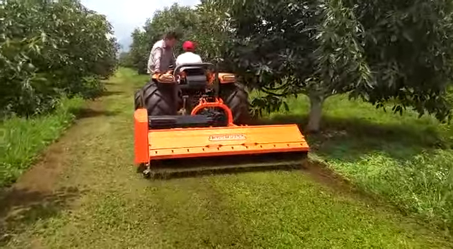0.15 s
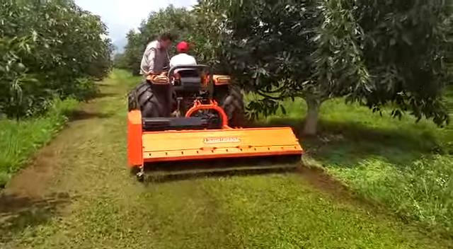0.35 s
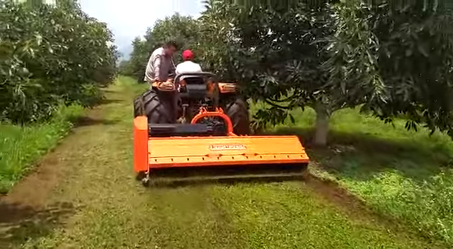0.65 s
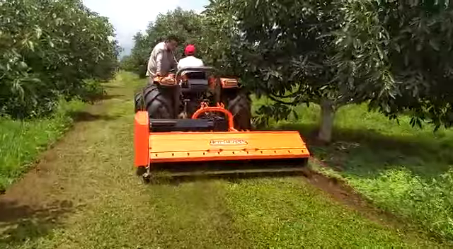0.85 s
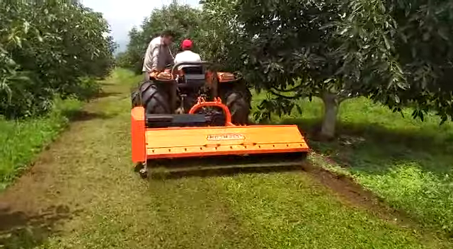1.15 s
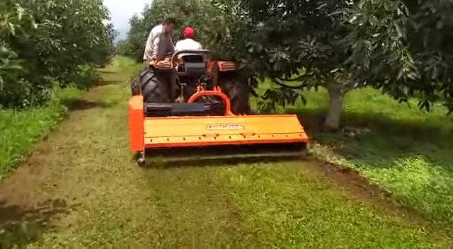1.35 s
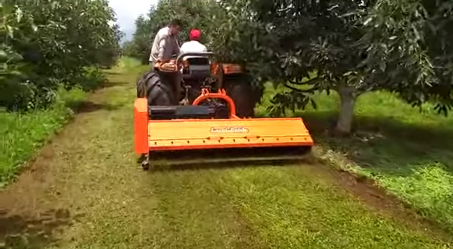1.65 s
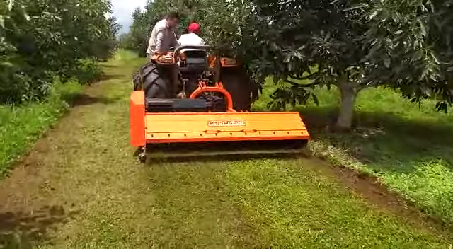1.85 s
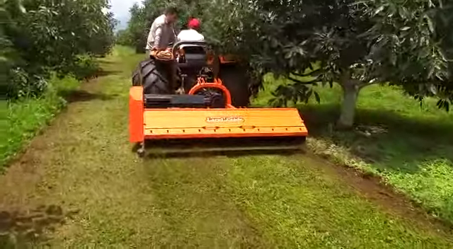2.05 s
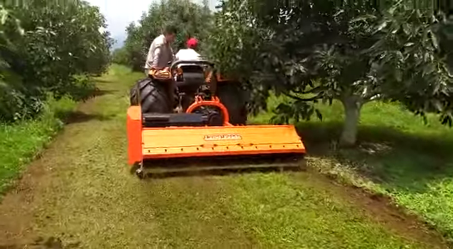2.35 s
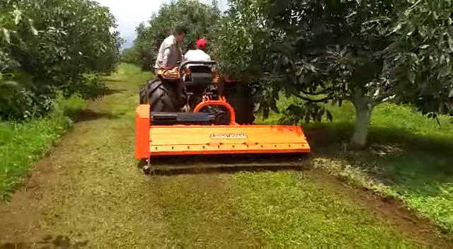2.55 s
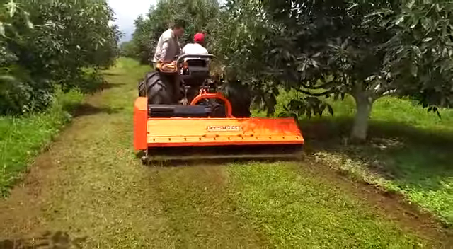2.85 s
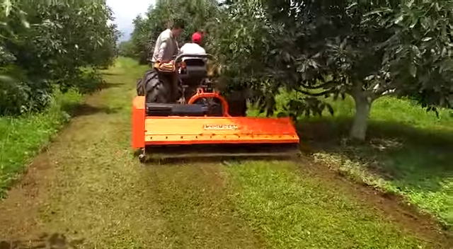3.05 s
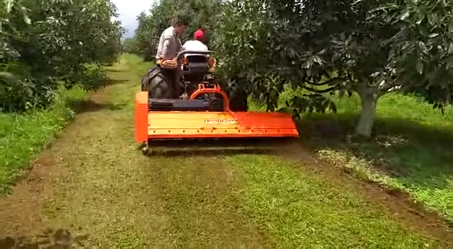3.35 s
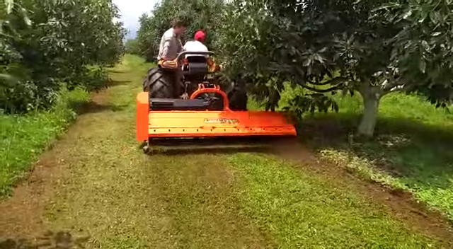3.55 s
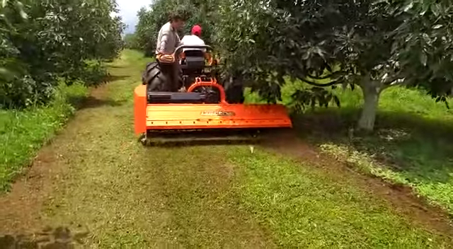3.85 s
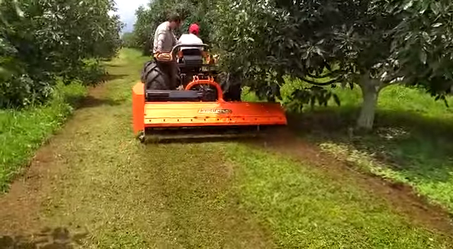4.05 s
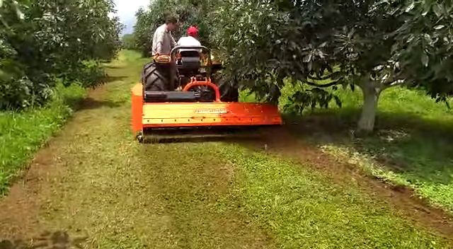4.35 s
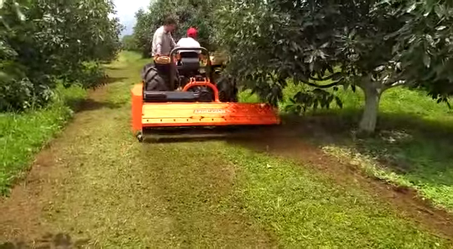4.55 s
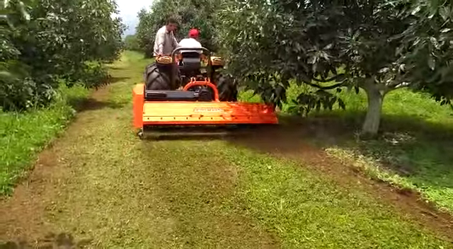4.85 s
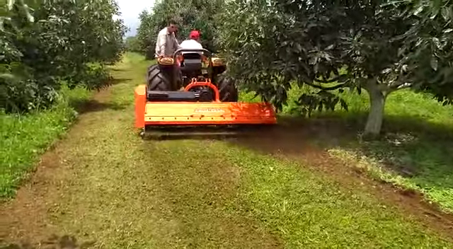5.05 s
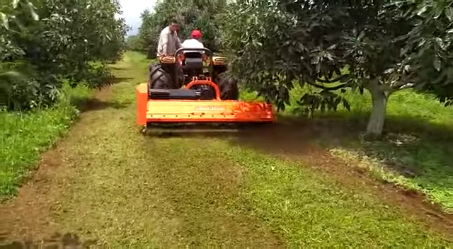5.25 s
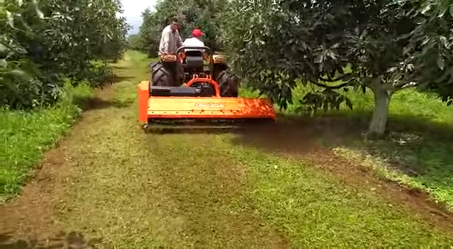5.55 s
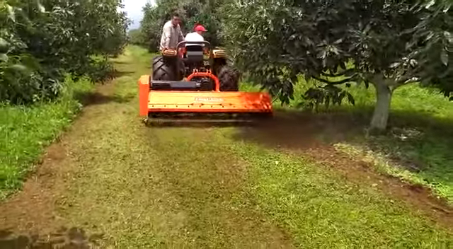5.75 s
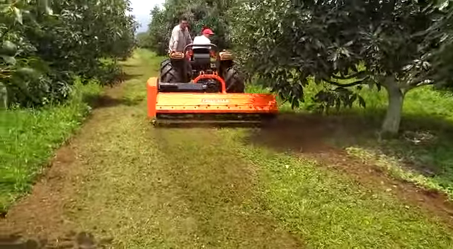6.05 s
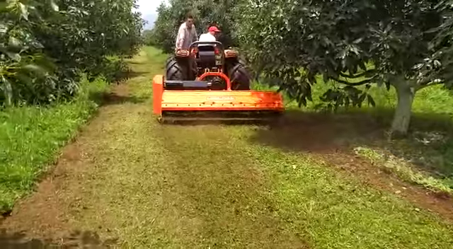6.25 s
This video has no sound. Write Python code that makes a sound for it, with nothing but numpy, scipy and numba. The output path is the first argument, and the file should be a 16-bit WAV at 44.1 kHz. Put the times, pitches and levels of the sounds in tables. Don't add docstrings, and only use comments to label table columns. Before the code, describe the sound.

A continuous mower drone with a rough, fluttering beat fills a small camera microphone outdoors. Beneath it a diesel exhaust throbs and gears whine thinly; above it cut stalks spray with a bright, pulsing hiss and a metallic hood rattle. Sticks and stones snap at random, grit ticks, clods knock dully. The cutting hiss thickens midway, then the hum fades somewhat as the machine moves off, still running.

```python
import sys
import numpy as np
from scipy import signal
from scipy.fft import rfft, irfft
from scipy.io import wavfile
from scipy.ndimage import uniform_filter1d
from numba import njit

SR = 44100
rng = np.random.default_rng(int(sys.argv[2]) if len(sys.argv) > 2 else 0)


def boost_factor(decibels):
    exponent = np.asarray(decibels, float) / 20
    return 10 ** exponent


def int16_out(signal):
    q = np.round(np.clip(np.atleast_2d(signal).T, -1, 1) * 32767)
    wavfile.write(sys.argv[1], SR, q.astype(np.int16))


N = 282681
BURST_N = 4000


def level(x):
    return x / np.sqrt(np.mean(x ** 2))


def colour(x, points):
    hz, db = np.transpose(points)
    log_hz = np.log(np.maximum(np.arange(4097) * SR / 8192, 1))
    log_gain = np.interp(log_hz, np.log(hz), db, left=-60, right=-60) * np.log(10) / 20
    cepstrum = irfft(log_gain)
    cepstrum[1:4096] *= 2
    cepstrum[4097:] = 0
    return signal.fftconvolve(x, irfft(np.exp(rfft(cepstrum))))[:N]


def walk(rate):
    hold = int(SR / rate)
    steps = np.repeat(rng.standard_normal(2000)[:N // hold + 1], hold)
    wander = uniform_filter1d(uniform_filter1d(steps, hold), hold)[:N]
    return wander / wander.std()


def phase(hz):
    return 2 * np.pi * np.cumsum(hz * np.ones(N)) / SR


def decay(x, ring_s):
    return signal.lfilter([1], [1, -np.exp(-1 / (ring_s * SR))], x)


def debris(rate, spread_db, ring_s):
    size_db = np.minimum(spread_db * rng.exponential(size=N), 10)
    hits = (rng.random(N) < rate / SR) * boost_factor(size_db)
    return level(decay(decay(hits, ring_s), ring_s / 3))


def bursts(times_s, ring_s, rise_s):
    age = np.arange(BURST_N) / SR
    shape = (1 - np.exp(-age / rise_s)) * np.exp(-age / ring_s)
    rows = rng.standard_normal((len(times_s), BURST_N)) * shape
    rows = rows * np.sqrt(np.sum(shape ** 2) / np.sum(rows ** 2, axis=1, keepdims=True))
    return (np.asarray(times_s) * SR).astype(int), rows


# start_s, row_rate_hz, hum_level_db
ROTOR_DRIFT = [(0.0, 157.7, -7), (0.6, 156.7, -7), (1.2, 157, -8), (2.0, 157, -7), (2.8, 157.1, -7),
               (3.7, 157, -7), (4.6, 157.5, -8), (5.2, 157.2, -8.5), (5.6, 157.07, -9.5), (6.0, 157.8, -11),
               (6.41, 157.7, -11.5)]


def rotor(t):
    start_s, row_hz, hum_db = np.transpose(ROTOR_DRIFT)
    return phase(np.interp(t, start_s, row_hz)), np.interp(t, start_s, hum_db)


# start_level_db, slope_db_per_s (ground echo shifts with distance), share of the hum's fade
HUM_MULTIPLES = [(-27.5, 0.08, 1), (-36, 1.22, 0.1), (-38, 1.0, 0.1), (-49, 1, 0.1)]
# multiple of shaft rate, level_db
UNEVEN_ROWS = [(1, -56), (2, -40), (3, -37), (5, -40), (6, -39), (14, -46), (24, -52)]


def hum(t, row, hum_db):
    faded_db = hum_db - hum_db[0]
    multiples_db = [hum_db]
    for db, slope, share in HUM_MULTIPLES:
        multiples_db.append(db + slope * t + share * faded_db)
    out = np.zeros(N)
    for k, db in enumerate(multiples_db):
        lead = 0.24 * k * k + 0.28 * k
        out += boost_factor(db + 0.18 * walk(16)) * np.cos((k + 1) * row + lead)
    for k, db in UNEVEN_ROWS:
        out += boost_factor(db + 4.5 * walk(3.9)) * np.cos(k * row / 4 + 6 * rng.random())
    return np.sqrt(2) * out


# multiple of firing rate, level_db
EXHAUST_THROB = [(1, -26.5), (2, -34.5)]
# pitch_hz, level_db
GEAR_WHINES = [(930, -49), (1203, -48.5), (1546, -43.5), (1856, -44.5), (2168, -49), (2475, -44),
               (2760, -43.5), (3092, -51), (5270, -50)]


def engine():
    firing_hz = 85.9
    fire = phase(firing_hz * (1 + 0.0018 * walk(3.78)))
    out = np.zeros(N)
    for k, db in EXHAUST_THROB:
        out += boost_factor(db + 3 * walk(14)) * np.sin(k * fire)
    speed = 1 + .001 * walk(4)
    for hz, db in GEAR_WHINES:
        out += boost_factor(db + 2 * walk(8)) * np.sin(phase(hz * (speed + .0009 * walk(40))))
    return np.sqrt(2) * out


# pitch_hz, density_db_per_hz
RUMBLE_COLOUR = [(25, -9), (45, -25), (62, -2.5), (80, 1.5), (150, 1), (250, -4), (300, -5.5), (400, -11),
                 (520, -6), (700, -12.5), (1000, -12.5), (1350, -17), (1600, -22.5)]
# pitch_hz, density_db_per_hz
FRAME_COLOUR = [(1300, -12), (1550, 7), (1780, -1.5), (2000, 4), (2250, -4), (2600, 2)]


def rumble(away_db, twig_db):
    work_db = 0.66 * away_db + 0.6 * twig_db
    buzz_db = -29 + 1.5 * away_db + 0.32 * twig_db
    roar = level(colour(rng.standard_normal(N) * boost_factor(0.5 * walk(25.02)), RUMBLE_COLOUR))
    bass = signal.sosfilt(signal.butter(2, 450, fs=SR, output="sos"), roar)
    jolts = np.sqrt(1 + 0.091 * debris(70, 3.9, 0.0056) ** 2)
    mids = (roar - bass) * jolts * boost_factor(work_db - work_db.mean())
    buzz = level(colour(jolts * rng.standard_normal(N), FRAME_COLOUR)) * boost_factor(buzz_db)
    return boost_factor(-21.5) * (bass + mids) + buzz


# start_s, grass_thickness_db, extra_twigs_and_clods_db
FEED_CHANGES = [(0, -25.5, 0), (.41, -25, 0), (.8, -28, 0), (1.05, -27.5, 0.5), (1.28, -25, 0),
                (1.6, -26.5, 1), (2.0, -25, -.5), (2.4, -25, -0.5), (2.85, -23, -1), (3.18, -21.5, 1),
                (3.9, -21.5, -1), (4.5, -22.5, 1), (4.84, -22.5, 0), (5.2, -22.5, 1), (5.69, -26.5, -1),
                (5.91, -26, -.5), (6.21, -24.5, -1), (6.41, -22, 0)]


def feed(t):
    start_s, grass_db, twig_db = np.transpose(FEED_CHANGES)
    middling_db = -24
    return np.interp(t, start_s, grass_db) - middling_db, np.interp(t, start_s, twig_db)


# pitch_hz, density_db_per_hz
HOOD_COLOUR = [(2100, -18.5), (2500, -7), (2900, -9.5), (3300, -6), (3750, -2), (4300, -5.5), (5300, -7.5),
               (6200, -12), (7000, -19.5), (9000, -23)]
# pitch_hz, density_db_per_hz
BLADE_COLOUR = [(5500, -43), (6800, -7.5), (7700, -5.5), (9400, -8), (11000, -3.5), (13000, -1.5),
                (14500, -2.5), (15500, -7.5), (15750, -23)]


def cutting(row, grass_db, twig_db):
    hood_db = -20.45 + 0.34 * grass_db + twig_db
    blade_db = -23.8 + 1.04 * grass_db
    shower = boost_factor(0.91 * walk(11) + 0.25 * walk(45) + 0.11 * np.cos(row / 4))
    bits = debris(300, 1.1, 0.0066)
    rattle = shower * np.sqrt(1 + .5 * bits ** 2 + 0.13 * debris(170, 2.3, 0.0042) ** 2)
    puffs = boost_factor(1.7 * np.cos(row - 1.1) + 0.33 * np.cos(row / 2))
    hiss = shower * puffs * np.sqrt(1 + 0.62 * bits ** 2 + 0.38 * debris(250, 2.8, 0.00072) ** 2)
    rattle = level(colour(rattle * rng.standard_normal(N), HOOD_COLOUR))
    hiss = level(colour(hiss * rng.standard_normal(N), BLADE_COLOUR))
    return rattle * boost_factor(hood_db) + hiss * boost_factor(blade_db)


# start_s, peak_level_db, treble_level_db
STICKS_AND_STONES = [(0.174, -7, -11), (0.3127, -1, -14), (0.4828, 1.5, -15), (1.1139, -2, -17),
                     (1.5454, -6, -5), (1.7883, -5.5, -8), (2.0148, -7, -9), (2.21, -12, -15),
                     (2.2724, 8, -12), (2.4648, -4, -15), (2.5481, -6.5, -11), (3.069, 2, -11),
                     (3.1338, -7, -13), (3.3149, -10, -12), (3.4321, -6, -5), (3.5867, -6, -11.5),
                     (3.7682, -6.5, -8), (4.0267, -12, -10), (4.1659, -3.5, -8), (4.2364, -2, -3),
                     (4.298, -4, -10), (4.4578, -4.5, -1.5), (4.583, -6, -11), (5.0215, -1, -13),
                     (5.0784, -4, -13), (5.1023, -2, -14), (5.464, -6, -12), (5.672, -5, -14),
                     (6.08, 1.5, -6)]
# start_s, peak_level_db, treble_level_db
SPLINTER_SHOWERS = [(0.408, -11.5, -11), (0.495, -6, -17), (0.5074, -8, -14), (1.0985, -11, -18),
                    (1.1244, -9.5, -6), (1.3793, -10.5, -7), (1.6394, -14, -9), (1.799, -11, -10),
                    (2.325, -6.5, -14), (2.805, -13, -13), (3.399, -13, -4), (3.4197, -10, -2),
                    (3.4474, -20, -10), (4.639, -8.5, -11), (4.8894, -6, -7), (6.072, -8, -18),
                    (6.101, -15, -11), (6.1194, -10, -2), (6.3454, -10, -1), (6.36, -14, -8)]
# pitch_hz, density_db_per_hz
CRACK_COLOUR = [(500, -32), (1000, -19), (2500, -18), (3200, -6), (3800, 0), (4500, -3), (5500, -8),
                (7000, -15), (9000, -26)]


def strikes():
    crack, spray = np.zeros((2, N + BURST_N))
    for table, ring_s in (STICKS_AND_STONES, 0.0041), (SPLINTER_SHOWERS, 0.01):
        start_s, peak_db, treble_db = np.transpose(table)
        starts, rows = bursts(start_s, ring_s, .0006)
        for i, burst, size, treble in zip(starts, rows, boost_factor(peak_db), boost_factor(treble_db)):
            crack[i:i + BURST_N] += size * burst
            spray[i:i + BURST_N] += size * treble * burst
    return boost_factor(6) * colour(crack, CRACK_COLOUR) + boost_factor(4) * colour(spray, BLADE_COLOUR)


# start_s, peak_level_db
GRIT_TICKS = [(0.2793, -8), (1.063, -5), (1.2466, -11), (1.5454, -6), (1.8244, -6), (2.0153, -9),
              (2.0781, -3), (2.2737, -10), (2.5406, -5), (2.7132, -7), (2.7881, -14), (2.821, -3),
              (2.8968, -8), (2.9147, -2), (2.9916, -1.5), (3.0684, -4), (3.3179, -15), (3.4057, -6),
              (3.5862, -10), (3.6292, -2), (3.9744, -7.5), (4.139, -9.5), (4.1508, -7), (4.2353, -8),
              (4.6089, -10), (5.0153, -7), (5.795, -5), (6.0786, -3), (6.2745, -13), (6.3405, -9)]


def ticks():
    ring_s = 0.0018
    stray_per_s, stray_db, stray_spread_db = 6, -10, -1
    out = np.zeros(N + BURST_N)
    start_s, peak_db = np.transpose(GRIT_TICKS)
    for i, burst, size in zip(*bursts(start_s, ring_s, .0001), boost_factor(peak_db)):
        out[i:i + BURST_N] += size * burst
    stray_size = boost_factor(stray_db + stray_spread_db * rng.standard_normal(N))
    stray = (rng.random(N) < stray_per_s / SR) * stray_size
    return colour(out[:N] + decay(stray, ring_s) * rng.standard_normal(N), BLADE_COLOUR)


# start_s, peak_level_db
CLOD_THUDS = [(0.485, -10), (0.537, -20), (0.653, -18), (0.927, -22), (1.453, -16), (1.626, -14.5),
              (1.799, -18), (2.272, -21), (3.069, -14), (4.57, -19), (4.702, -19), (5.269, -19)]


def thuds():
    centre_hz, width_oct, ring_s = 950, 1.6, 0.0076
    out = np.zeros(N + BURST_N)
    start_s, peak_db = np.transpose(CLOD_THUDS)
    for i, burst, size in zip(*bursts(start_s, ring_s, .0007), boost_factor(peak_db + 10.5)):
        out[i:i + BURST_N] += size * burst
    edges_hz = centre_hz * 2 ** (width_oct * np.array([-.5, .5]))
    return signal.sosfilt(signal.butter(1, edges_hz, "band", fs=SR, output="sos"), out[:N])


def scene():
    t = np.arange(N) / SR
    start_m, speed_m_s = 8.2, 0.59
    away_db = -20 * np.log10(1 + speed_m_s * t / start_m)
    row, hum_db = rotor(t)
    grass_db, twig_db = feed(t)
    machine = hum(t, row, hum_db) + engine() + rumble(away_db, twig_db)
    grass = cutting(row, grass_db, twig_db)
    return (machine + grass + strikes() + ticks() + thuds())[None]


@njit
def follow(x, attack, release):
    y, e = np.empty(len(x)), .6
    for i in range(len(x)):
        e += (abs(x[i]) - e) * (attack if abs(x[i]) > e else release)
        y[i] = e
    return y


def top_cut(x):
    return signal.sosfilt(signal.butter(12, 15700, fs=SR, output="sos"), x)


def record(dry):
    attack_s, release_s, squeeze = .001, .007, .6
    envelope = follow(dry[0], 1 / (attack_s * SR), 1 / (release_s * SR))
    held = dry * (uniform_filter1d(envelope, SR // 10) / envelope) ** squeeze
    rounded = boost_factor(0.33) * np.tanh(0.55 * held) / 0.54
    ceiling = .85
    capped = rounded / (1 + (rounded / ceiling) ** 8) ** (1 / 8)
    capped = signal.sosfilt(signal.butter(2, 30, "high", fs=SR, output="sos"), capped)
    mix = signal.sosfiltfilt(signal.ellip(8, .2, 40, 15520, fs=SR, output="sos"), capped)
    return top_cut(mix)


dry = scene()
out = record(dry)
int16_out(out)
```